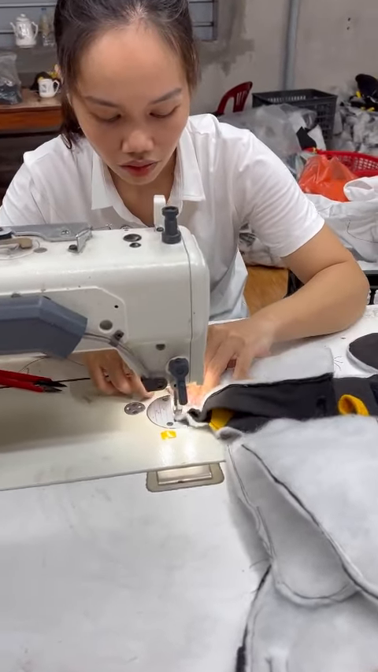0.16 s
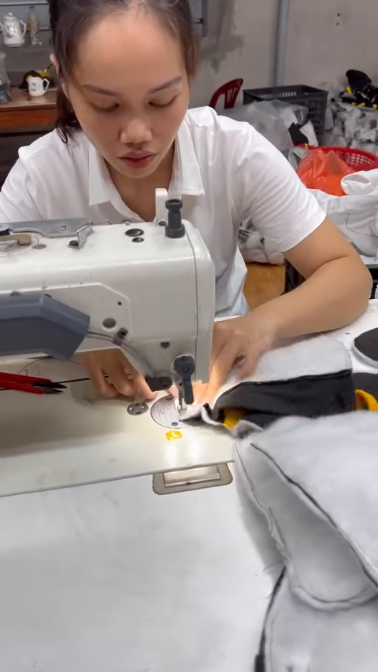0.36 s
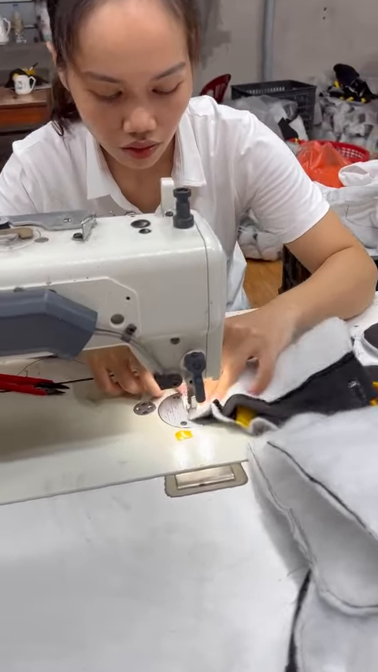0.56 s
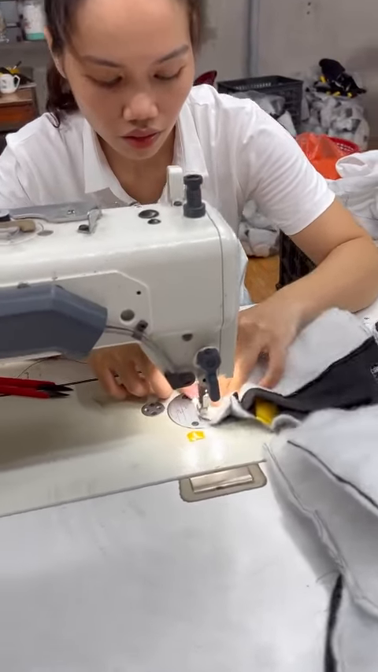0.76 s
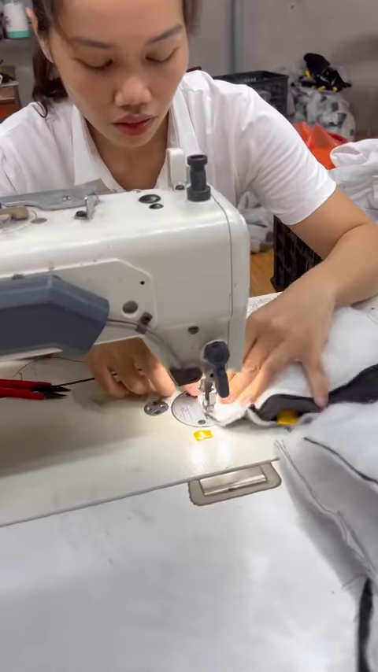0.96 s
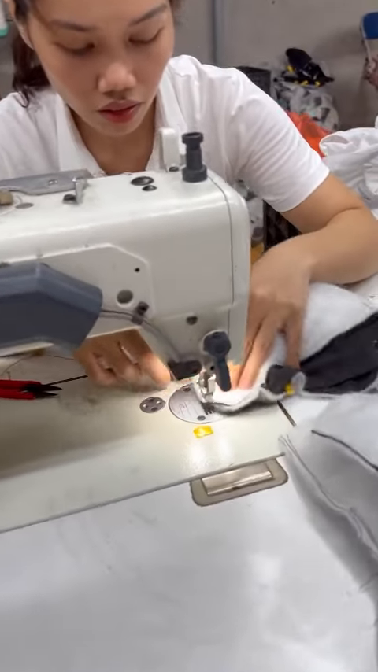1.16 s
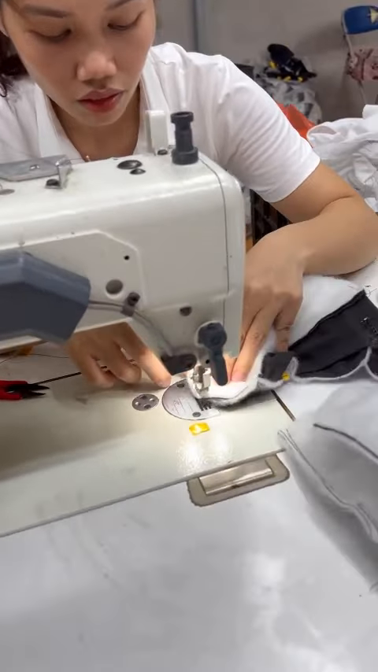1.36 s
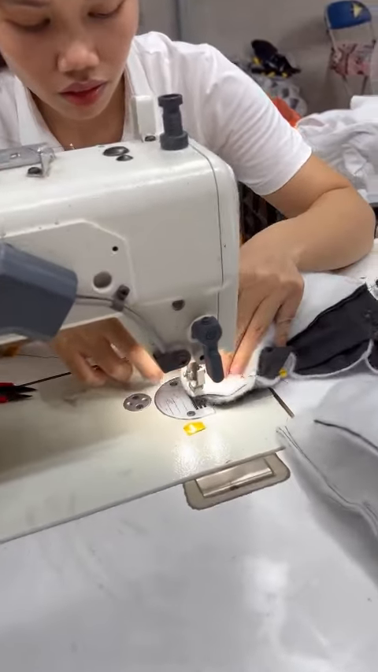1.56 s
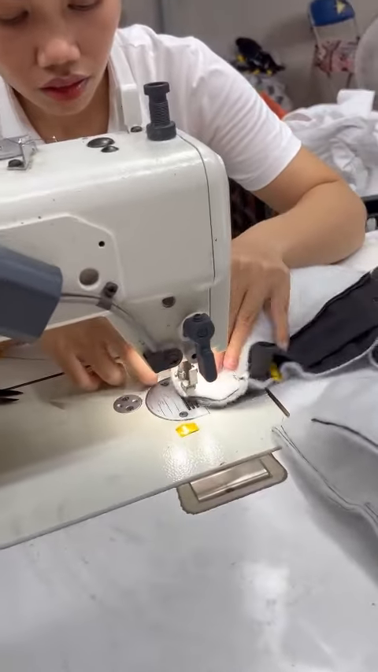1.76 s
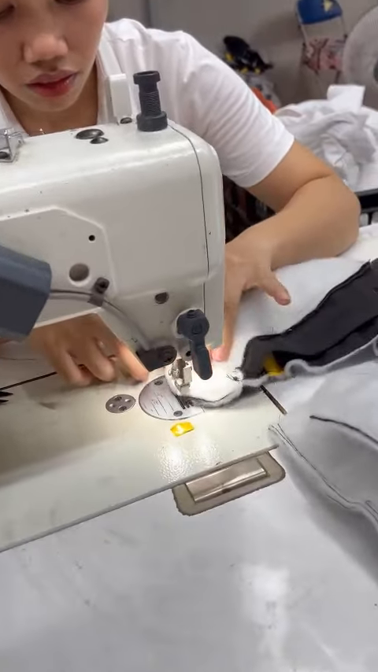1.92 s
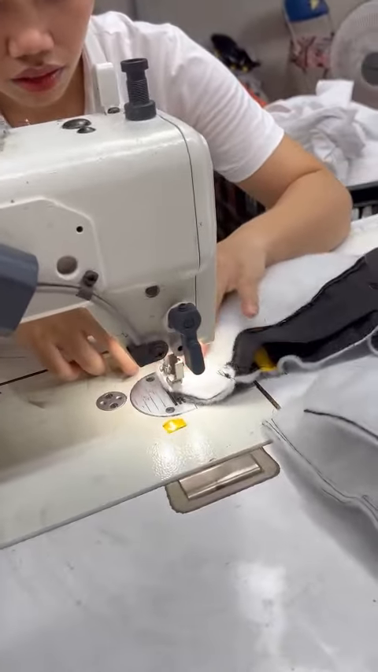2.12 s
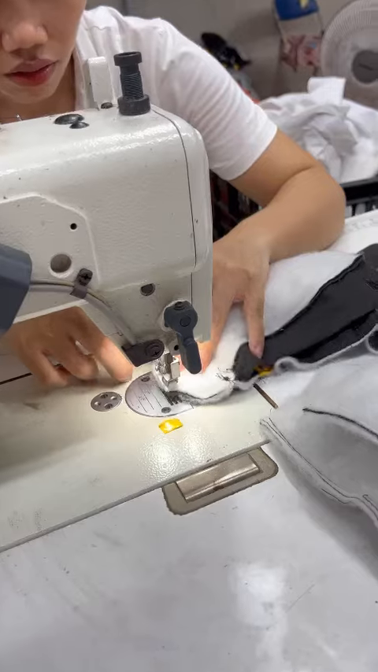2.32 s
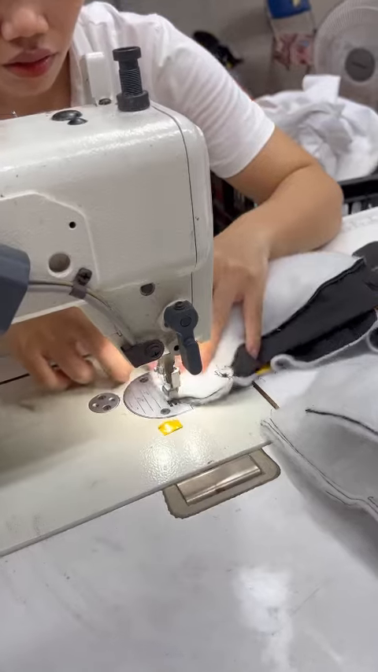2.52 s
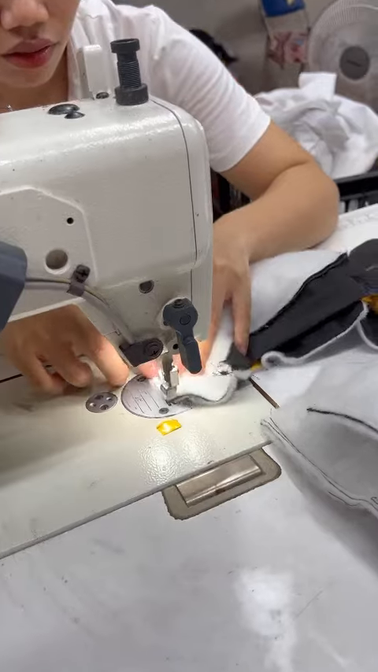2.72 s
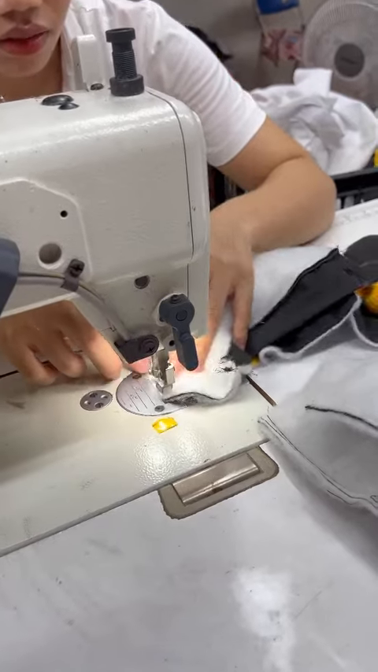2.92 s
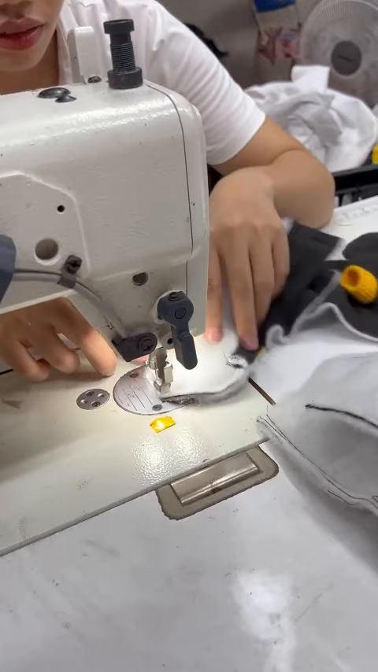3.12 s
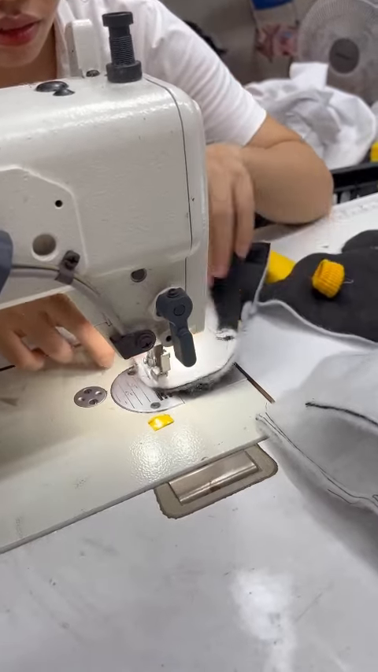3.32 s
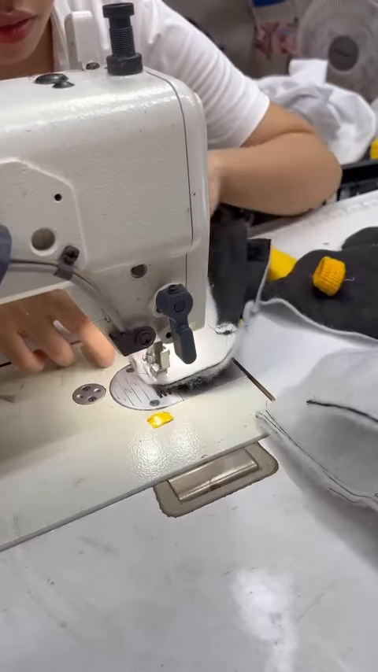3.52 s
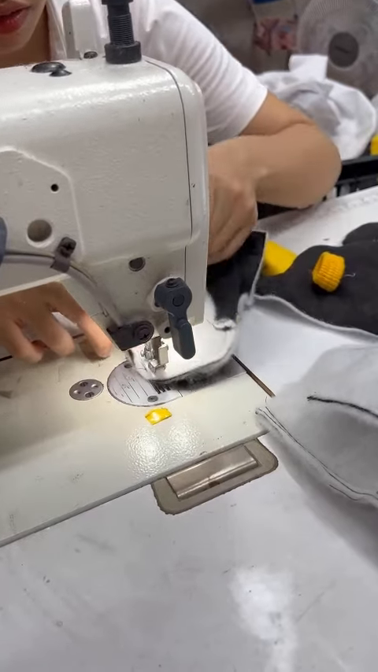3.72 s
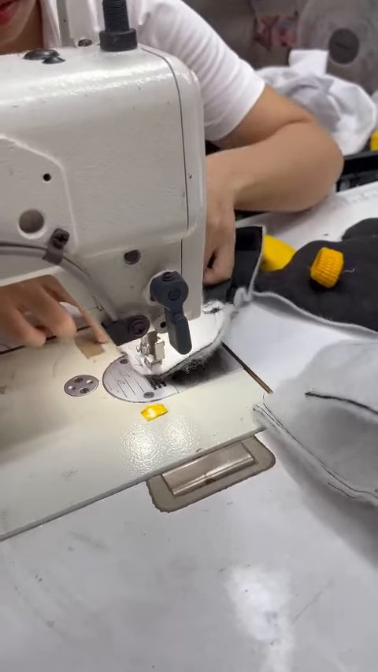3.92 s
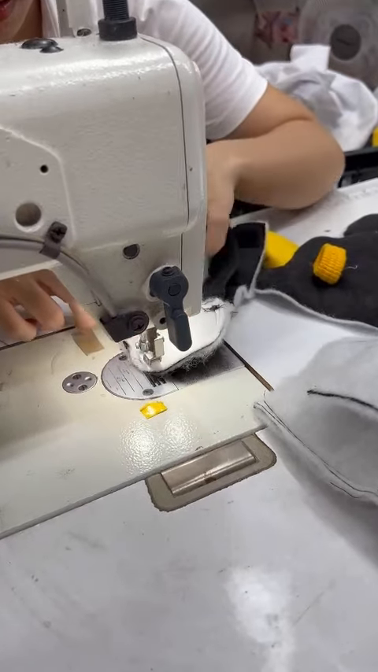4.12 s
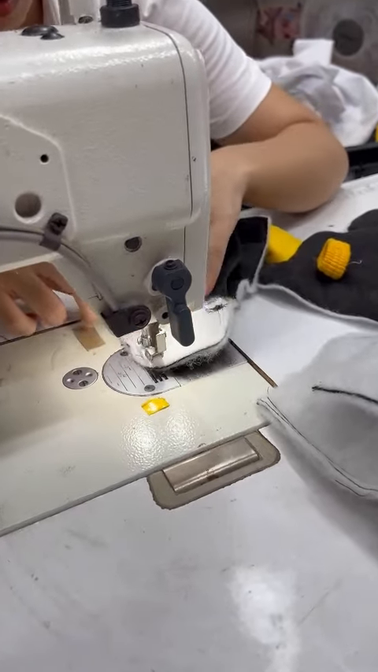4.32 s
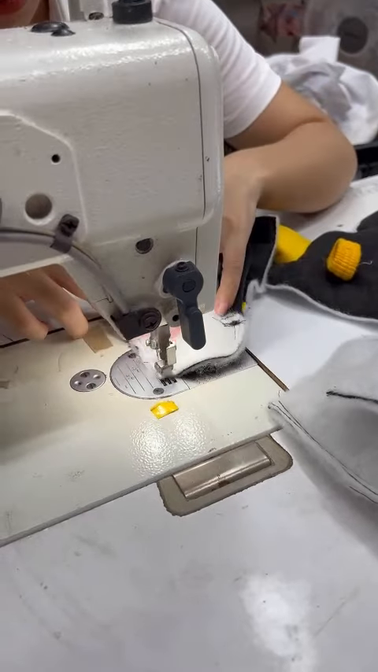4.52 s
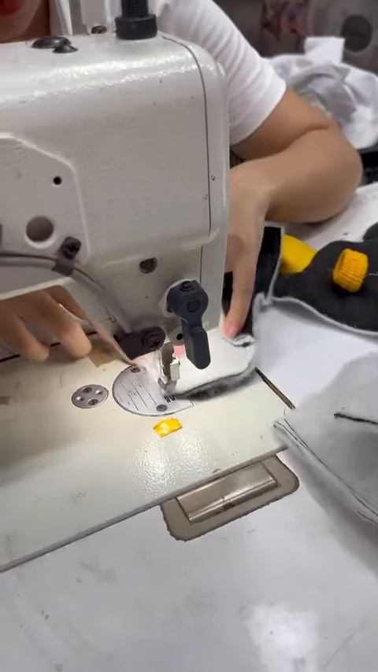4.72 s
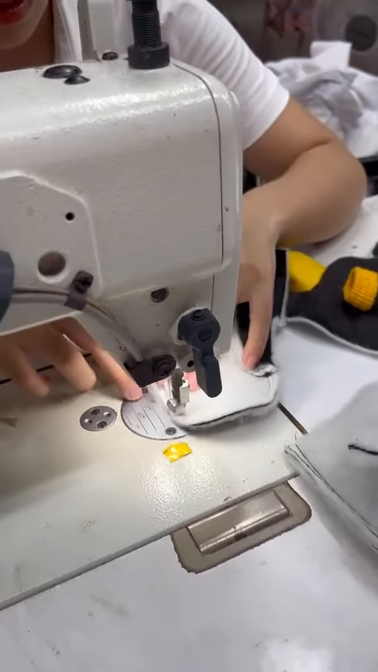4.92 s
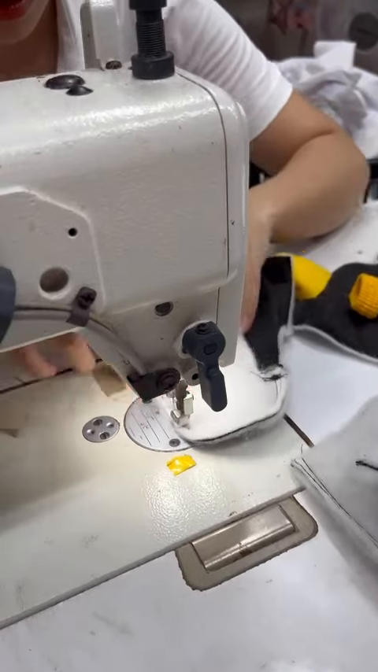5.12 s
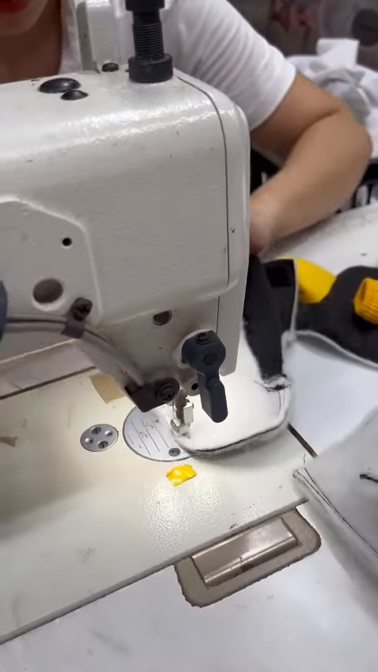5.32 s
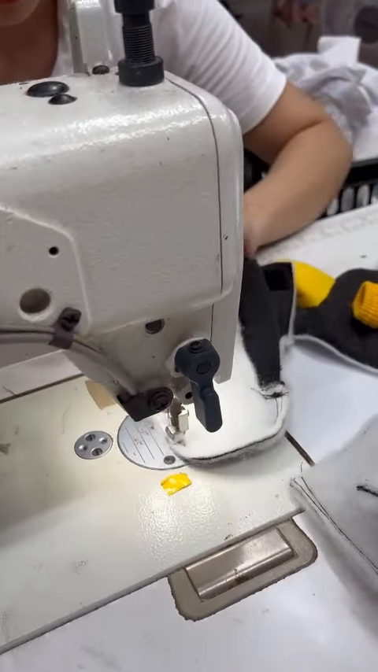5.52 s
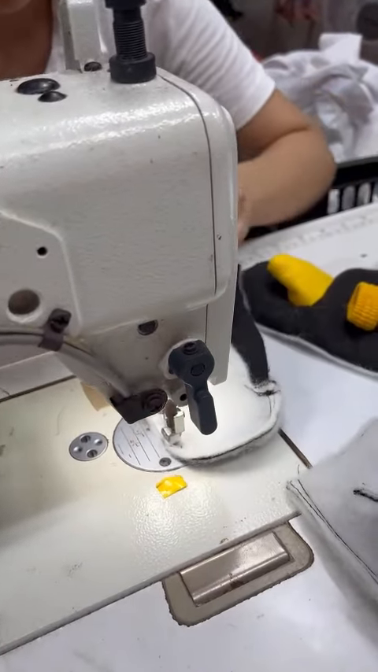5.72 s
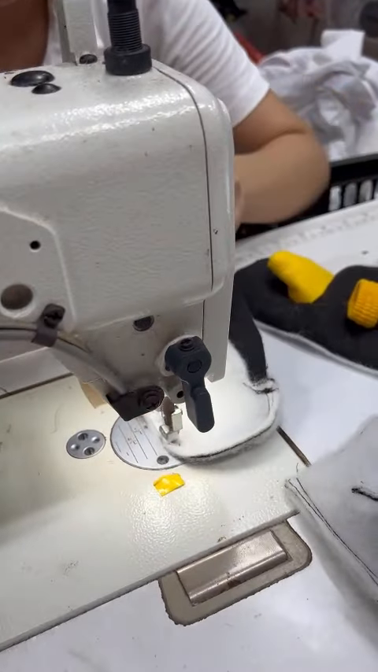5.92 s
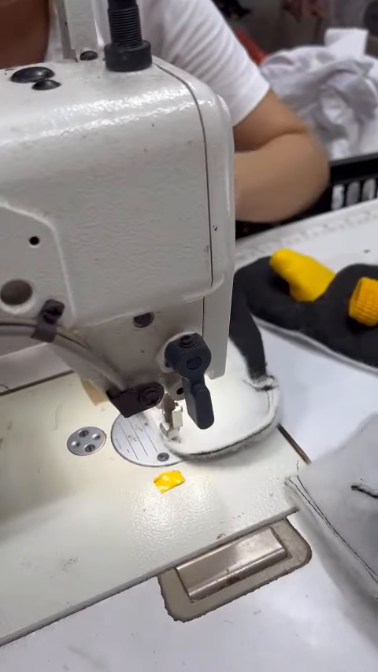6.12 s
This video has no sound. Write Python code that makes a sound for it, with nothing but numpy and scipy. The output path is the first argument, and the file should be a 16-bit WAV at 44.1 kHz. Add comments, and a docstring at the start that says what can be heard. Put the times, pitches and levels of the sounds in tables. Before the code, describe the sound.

An industrial sewing machine is heard close up in a small, slightly echoing workshop. At about 0.1 seconds a small double click starts a burst of stitching lasting a third of a second: rapid metallic clatter over a low drone from the shaking table. A shorter burst runs from 0.6 to 0.8 seconds. Every run ends with a soft jolt and the click of the pedal springing back. After a dull pedal knock, the presser foot snaps up with a loud, sharp clack at 1.1 seconds. It rattles down with a low thump at 2.4, and a third burst runs from 2.6 to 2.9. Another knock and clack come around 3.2 seconds. The foot drops again at 4.5, the last burst runs from 4.6 to 5.0, and the pedal clicks at 5.1. Quiet fan air, low motor hum and a faint high whine continue throughout, until about 6 seconds.

```python
"""A small double click, and an industrial lockstitch machine bursts into the first of four short runs,
close by in a small workshop. At about 70 stitches a second the shaft shakes the table while needle bar,
hook and feed clatter once a turn; each run ends in a jolt and the click of the pedal springing back.
Twice the pedal is heeled back: the presser foot clacks up, waits, then rattles down again.
Behind it all lie fan-stirred air, a low motor hum and a thin whine from the drive."""
import sys
import numpy as np
from scipy import signal
from scipy.fft import rfft, irfft, next_fast_len
from scipy.io import wavfile

SR = 44100
rng = np.random.default_rng(int(sys.argv[2]) if len(sys.argv) > 2 else 0)


def to_wav(sig):
    """Store sig (one row per channel, or 1-D mono) as 16-bit WAV at the path in sys.argv[1].

    Samples outside -1..1 are clipped; the rate is SR.
    """
    pcm = np.clip(np.atleast_2d(sig), -1, 1) * 32767
    pcm = np.round(pcm).astype(np.int16)
    wavfile.write(sys.argv[1], SR, pcm.T)  # frames by channels


N = 272097
T = np.arange(N) / SR
FFT_SIZE = next_fast_len(N + SR, real=True)
HZ = np.maximum(np.arange(FFT_SIZE // 2 + 1) * SR / FFT_SIZE, 1)
STITCH_HZ, RUN_UP_S = 70.1, .086
TABLE_LAG_S = .00595   # the heavy table follows the shaft a little late


# The runs of stitching. Each row: start, time at full speed and braking time in seconds, shake in dB,
# rocking at four a turn in dB against the shake, boost of the harmonics above the fourth in dB,
# thrum in dB, clatter in dB.
RUNS = [(0.070, 0.14, 0.092, -12.5, -11.5, -4.5, -23.5, -21.5),
        (0.566, 0.06, 0.093, -11.5, -14.5, -1, -21.5, -20.5),
        (2.564, .140, 0.07, -10.5, -16, 0.5, -21, -19), (4.629, 0.2, .064, -10, -21, -3, -21.5, -18)]
def shaft(start, hold, braking):
    """The servo ramps up, holds and brakes; gives the moving samples, share of full speed and turns."""
    speed = np.interp(T, start + np.cumsum([0, RUN_UP_S, hold, braking]), [0, 1, 1, 0])
    moving = speed > 0
    return moving, speed[moving], np.cumsum(speed[moving]) * STITCH_HZ / SR


def contacts(turns, places, weights, slop_s=.00008, uneven_db=3):
    """Every turn repeats the same round of metal contacts, a little uneven in time and force."""
    due = np.arange(int(turns[-1]) + 1)[:, None] + places
    when = np.interp(due, turns, np.arange(len(turns))) + slop_s * SR * rng.standard_normal(due.shape)
    force = from_db(uneven_db * rng.standard_normal(due.shape)) * (due < turns[-1])
    samples = np.clip(when, 0, len(turns) - 1).astype(int).ravel()
    return np.array([rms_one(np.bincount(samples, (force * w).ravel(), len(turns))) for w in weights])


# The tone of the clatter. Each row: frequency in Hz, relative level in dB.
CLATTER_TONE = [(100, -13), (300, -15.5), (560, 4.5), (800, -11), (950, -1.5), (1400, -5), (1700, 1.5),
                (2400, -0.5), (2800, -5), (5300, -10.5), (6400, -12.5), (7200, -12), (10000, -13),
                (16000, -20.5)]
# The cast head and needle plate ring here. Each row: frequency in Hz, width in Hz, boost in dB.
HEAD_RINGS = [(379, 29, 9), (1656, 20, 7), (1790, 120, 6), (2022, 71, 7), (2140, 25, 3.5), (2302, 34, 5),
              (2513, 55, 8.5), (3070, 110, 4), (3530, 120, 5), (4630, 340, 6.5), (6020, 550, 8),
              (6300, 100, 4.5), (8040, 330, 3), (9300, 190, -3.5)]
def needle_clatter(count=50, rub_db=-5, throb=.7, easing_db=-20, echo_ring_share=.5):
    """Needle bar, hook and feed strike the head; gives the close sound and an echo that rings less."""
    places, weights = rng.random(count), rng.choice([-1, 1], (2, count))
    clatter = np.zeros((2, N))
    for start, hold, braking, *_, clatter_db in RUNS:
        moving, speed, turns = shaft(start, hold, braking)
        # thread and cloth rub between the contacts, hardest once a turn
        rub = from_db(rub_db) * noise(len(turns)) * (1 + throb * np.cos(2 * np.pi * turns))
        # once the drive lets go, the contacts ease off faster than the shaft slows
        braked = np.maximum(T[moving] - start - RUN_UP_S - hold, 0) / braking
        force = from_db(clatter_db + easing_db * braked) * speed ** 1.22
        clatter[:, moving] += force * (contacts(turns, places, weights) + rub) / np.sqrt(2)
    softened = [(hz, width, echo_ring_share * db) for hz, width, db in HEAD_RINGS]
    echo = workshop(body(clatter, CLATTER_TONE, softened), wet_db=-16)
    return body(clatter, CLATTER_TONE, HEAD_RINGS), echo


# The low drone of head and table. Each row: multiple of the shaft rate, relative level in dB.
SHAKE_HARMONICS = [(1, 0.5), (2, -7), (3, -24.5), (5, -19.5), (6, -26), (7, -51), (8, -25), (9, -23.5)]
def table_shake():
    """Out-of-balance forces shake head and table, growing steeply with shaft speed."""
    shake = np.zeros(N)
    for start, hold, braking, shake_db, rocking_db, upper_db, *_ in RUNS:
        moving, speed, turns = shaft(start, hold, braking)
        harmonics = sum(from_db(db + upper_db * (k > 4)) * np.sin(2 * np.pi * k * turns)
                        for k, db in SHAKE_HARMONICS + [(4, rocking_db)])
        shake[moving] += np.sqrt(2) * from_db(shake_db) * speed ** 2.8 * harmonics
    return late(shake, TABLE_LAG_S)


# The tone of the table top's thrum. Each row: frequency in Hz, relative level in dB.
THRUM_TONE = [(30, -45), (55, -30.5), (95, 9.5), (170, 2), (230, 1), (310, -7), (380, -1), (470, -8),
              (600, -5.5), (760, -13.5), (1500, -37)]
def table_thrum():
    """The turning shaft stirs a rough rumble in the table top; gives the close sound and its echo."""
    thrum = np.zeros((2, N))
    for start, hold, braking, *_, thrum_db, _ in RUNS:
        moving, speed, _ = shaft(start, hold, braking)
        thrum[:, moving] += from_db(thrum_db) * speed ** 3.3 * noise(len(speed))
    thrum = late(thrum, TABLE_LAG_S)
    return body(thrum, THRUM_TONE, HEAD_RINGS), workshop(body(thrum, THRUM_TONE), wet_db=-9.5)


def start_scrape(level_db=-30):
    """While the motor pulls up to speed, the loaded drive scrapes in the head's main resonance."""
    ramp_s = RUN_UP_S * np.array([0, .35, .65, 1])
    torque = sum(np.interp(T, start + ramp_s, [.0098, .23, 1, 0]) for start, *_ in RUNS)
    return from_db(level_db) * torque * noise_band(centre_hz=2000, width_hz=550)


# The tone of a small steel tick. Each row: frequency in Hz, relative level in dB.
TICK_TONE = [(150, -19), (500, 4.5), (1100, -9.5), (1600, -2.5), (2100, 0.5), (3200, -8.5), (4500, -6.5),
             (6000, -7.5), (7200, -11), (8200, -7.5), (10000, -17), (16000, -21.5)]
# The double clicks. Each row: start in seconds, first click in dB, gap in seconds, second click in dB.
START_CLICKS = [(0.060, -31, 0.014, -41.5), (0.549, -33.5, 0.03, -32), (2.564, -22.5, .014, -23),
                (4.613, -27.5, .017, -24)]
def start_clicks(t60=.023):
    """As each run begins, the linkage takes up its slack in two clicks inside the head."""
    clicks = sum(tick(start, first_db, t60) + tick(start + gap, second_db, t60)
                 for start, first_db, gap, second_db in START_CLICKS)
    return body(clicks, TICK_TONE, HEAD_RINGS)


# The levers ring here. Each row: frequency in Hz, width in Hz, boost in dB.
LEVER_RINGS = [(2125, 159, 3), (2580, 210, 7.5), (8170, 450, 3)]
# The stop after each run. Each row: start in seconds, click in dB, brightness in dB, jolt in dB.
SHAFT_STOPS = [(0.352, -29, -12, -37), (0.802, -26, -11.5, -35), (2.876, -30.5, -3.5, -35.5),
               (4.989, -34.5, -10, -31.5)]
def stop_clicks():
    """The shaft locks with a click and one bounce, from parts too small to make much bass."""
    clicks = sum(bouncing(start, db, t60=.024, bright_db=bright_db, gap=.045, loss_db=14, count=2)
                 for start, db, bright_db, _ in SHAFT_STOPS)
    return body(butter_filter(clicks, 1000, "high"), TICK_TONE, LEVER_RINGS)


# The head's low modes on its table. Each row: pitch in Hz, dB against the jolt, t60 in seconds.
JOLT_MODES = [(74.5, 11.5, 0.44), (135.4, -6, 0.26), (278, -1.5, 0.99), (365, 2, 0.21), (620, -5, 0.32),
              (1115, -9, .15)]
def head_jolts(lead_s=.024):
    """As the shaft locks, the head rocks and its low modes ring out."""
    return sum(boom(stop - lead_s, jolt_db + db, hz, swell=.019, t60=t60)
               for stop, *_, jolt_db in SHAFT_STOPS for hz, db, t60 in JOLT_MODES)


# The pedal's return after each run. Each row: start in seconds, level in dB, bounce gap in seconds.
PEDAL_RELEASES = [(0.404, -34.5, 0.052), (0.870, -30, 0.041), (2.964, -25.5, .024), (5.104, -26, .042)]
def pedal_releases(chatter_db=-17):
    """The pedal springs back to rest with a bright click, bounces and rattles its rod."""
    clicks = 0
    for start, db, gap in PEDAL_RELEASES:
        clicks += bouncing(start, db, t60=.017, bright_db=5.5, gap=gap, loss_db=12)
        clicks += loose_rod(start, db + chatter_db)
    return body(clicks, TICK_TONE, LEVER_RINGS)


def loose_rod(start, level_db, length_s=.14, fade_db=12, count=7):
    """The pedal's rod chatters at random, ever more faintly."""
    return sum(tick(start + length_s * share, level_db - fade_db * share, t60=.048, bright_db=-12)
               for share in rng.random(count))


# The tone of the lifter's clack. Each row: frequency in Hz, relative level in dB.
CLACK_TONE = [(120, -13.5), (300, -2.5), (550, 9), (760, -2.5), (1200, -6.5), (1600, -1), (2100, -4.5),
              (2600, 2), (3100, -8), (4800, -6.5), (6400, -7), (10000, -14), (16000, -21.5)]
# The presser foot and its bar ring here. Each row: frequency in Hz, width in Hz, boost in dB.
FOOT_RINGS = [(1640, 90, 7), (1900, 120, 8), (2570, 160, 8), (3750, 220, 9)]
# The foot snaps up. Each row: start in seconds, level in dB, t60 in seconds,
# rebound in dB against the snap, extra boost of the bar's upper rings in dB.
FOOT_LIFTS = [(1.0630, -6, 0.03, -21.5, 2.5), (3.1816, -11, 0.053, -6.5, -8)]
def foot_lifts(rebound_s=.021, buzz_db=-15):
    """The lifter snaps home, rebounds once and the bar buzzes; gives the clacks and the table's boom."""
    clacks, table = 0, 0
    lowest, *upper = FOOT_RINGS
    for start, db, t60, rebound_db, ring_db in FOOT_LIFTS:
        snap = blow(start, db, t60, attack=.0014) + blow(start + rebound_s, db + rebound_db, t60=.019)
        buzz = blow(start, db + buzz_db, t60=.12, attack=.013)
        rings = [lowest] + [(hz, width, boost_db + ring_db) for hz, width, boost_db in upper]
        clacks += body(butter_filter(snap, 900, "high") + buzz, CLACK_TONE, rings)
        table += boom(start, level_db=-27, hz=112, swell=.02, t60=.26)
    return clacks, table


# The tone of a dull knock on the table. Each row: frequency in Hz, relative level in dB.
KNOCK_TONE = [(100, -8), (380, 1.5), (520, -3), (690, -4), (900, -11), (1700, -13.5), (2500, -23),
              (6000, -39), (14000, -61)]
def pedal_heel(lead_s=.152, travel_s=.04):
    """Before each lift the heel knocks the pedal back, then onto its end stop; gives knocks and boom."""
    knocks, taps, table = 0, 0, 0
    for lift, *_ in FOOT_LIFTS:
        start = lift - lead_s
        end_stop = start + travel_s
        knocks += blow(start, level_db=-27.5, t60=.115) + blow(end_stop, level_db=-28, t60=.082)
        taps += tick(end_stop, level_db=-45, t60=.023, bright_db=-12.5)
        table += boom(start, level_db=-22, hz=81.4, swell=.05, t60=.46)
    return body(knocks, KNOCK_TONE) + body(taps, TICK_TONE, LEVER_RINGS), table


# The foot drops onto the cloth. Each row: landing time in seconds, level in dB,
# the pedal's head start in seconds, pitch of the table's boom in Hz.
FOOT_LANDINGS = [(2.445, -22, .168, 95), (4.482, -20.5, 0.089, 81.2)]
def foot_landings(unlatch_s=.0087):
    """The pedal stirs the table, the lifter lets go, the foot lands bouncing; gives rattle and boom."""
    taps, knocks, table = 0, 0, 0
    for landing, db, pedal_lead, table_hz in FOOT_LANDINGS:
        taps += tick(landing - unlatch_s, db - 6, t60=.033, bright_db=-.5)
        taps += bouncing(landing, db, t60=.033, bright_db=4.5, gap=.012, loss_db=3.5)
        knocks += blow(landing, db - 5, t60=.16)
        table += boom(landing - pedal_lead, db - 6, hz=101.1, swell=.025, t60=.6)
        table += boom(landing, db - 1, table_hz, swell=.036, t60=.25)
        table += boom(landing, db - 13.5, hz=198.6, swell=.041, t60=.56)
    return body(taps, TICK_TONE, LEVER_RINGS) + body(knocks, KNOCK_TONE), table


# The tone the lifted foot sends into the room. Each row: frequency in Hz, relative level in dB.
LIFT_ECHO_TONE = [(150, -23), (500, -8.5), (1500, -5), (4500, -11), (9000, -15.5), (16000, -28)]
def lift_echo():
    """The room takes the lifter's clack from all sides at once, as one sharp crack."""
    cracks = np.zeros((2, N))
    cracks[:, [int(start * SR) for start, *_ in FOOT_LIFTS]] = 1
    return workshop(body(cracks, LIFT_ECHO_TONE), wet_db=-10, onset=.007)


# The workshop's reverb tail. Each row: frequency in Hz, t60 in seconds.
ROOM_DECAY = [(100, 1), (400, 0.71), (1500, 0.66), (4000, 0.46), (8000, 0.88), (14000, 0.59)]
def workshop(x, wet_db, onset=.0035, dull_hz=9000):
    """The diffuse echo alone builds quickly and dies band by band; piles of cloth soak up the top."""
    age, edges = T[:SR], np.geomspace(40, 18000, num=9)
    white, tail = rng.standard_normal((2, 2, SR)), 0
    for k, (low, high) in enumerate(zip(edges, edges[1:])):
        band = butter_filter(white[k % 2], [low, high], "band")
        hz = np.sqrt(low * high)
        tail += band * from_db(-60 * age / at_hz(ROOM_DECAY, hz)) / np.hypot(1, hz / dull_hz)
    build_up = 1 - np.exp(-(age / onset) ** 2)
    response = rms_one(tail * build_up) / np.sqrt(SR)
    return from_db(wet_db) * signal.fftconvolve(x, response, axes=1)[:, :N]


def faint_ring(start=.3, end=1.04, fade_s=.04, level_db=-58.5):
    """A faint, narrow band of noise hangs on from late in the first run until after the second."""
    envelope = np.clip(np.minimum(T - start, end - T) / fade_s, 0, 1)
    return from_db(level_db) * envelope * noise_band(centre_hz=2830, width_hz=230)


# The tone of the workshop's air. Each row: frequency in Hz, relative level in dB.
AIR_TONE = [(20, -36), (32, -12.5), (53, -8.5), (75, 2), (95, -8), (120, -0.5), (256, -4.5), (300, -7),
            (443, -10.5), (520, -16.5), (858, -18.5), (1950, -28), (5320, -45), (7000, -45), (9100, -69.5),
            (15400, -77)]
# The hums and the whine. Each row: frequency in Hz, width in Hz, level in dB.
MOTOR_HUMS = [(62.15, 3.5, -50.5), (189, 5, -53.5), (268.8, 5.5, -59), (7540, 500, -68.5)]
def room_tone(air_db=-41.5):
    """Fan-stirred air, with motor hums and the drive's thin whine wavering as narrow bands of noise."""
    air = from_db(air_db) * body(noise(), AIR_TONE)
    bands = sum(from_db(db) * rms_one(1 / (1 + (2 * (HZ - hz) / width) ** 4))
                for hz, width, db in MOTOR_HUMS)
    return air + irfft(rfft(noise(FFT_SIZE)) * bands, FFT_SIZE)[:, :N]


def blow(start, level_db, t60, attack=.002):
    """One contact: a dense buzz of vibration that dies away, in two unrelated channels."""
    out, first = np.zeros((2, N)), int(start * SR)
    age = T[:min(SR // 2, N - first)]
    envelope = np.minimum(age / attack, 1) * from_db(level_db - 60 * age / t60)
    out[:, first:first + len(age)] = envelope * noise(len(age))
    return out


def tick(start, level_db, t60, bright_db=0, pivot_hz=3000):
    """A small steel part taps the head, duller or brighter about a middle pitch."""
    tap = blow(start, level_db, t60, attack=.0016)
    low = butter_filter(tap, pivot_hz, "low", order=1)
    return low * from_db(-bright_db) + (tap - low) * from_db(bright_db)


def bouncing(start, level_db, t60, bright_db, gap, loss_db, count=3):
    """A tick and its bounces, each weaker than the last."""
    return sum(tick(start + k * gap, level_db - k * loss_db, t60, bright_db) for k in range(count))


def boom(start, level_db, hz, swell, t60):
    """A push swells one of the table's low vibrations, which then dies."""
    out, first, age = np.zeros(N), int(start * SR), T[:SR]
    envelope = np.minimum(age / swell, 1) * from_db(level_db - 60 * np.maximum(age - swell, 0) / t60)
    out[first:first + SR] = envelope * np.sin(2 * np.pi * hz * age)
    return out


def body(x, tone, rings=()):
    """Play x through a body with a broad tone and resonant peaks; white noise keeps its power."""
    peaks_db = sum(db / (1 + (2 * (HZ - hz) / width) ** 2) for hz, width, db in rings)
    gain = rms_one(from_db(at_hz(tone, HZ) + peaks_db))
    # minimum phase, so the ringing follows the hit
    cepstrum = irfft(np.log(gain), FFT_SIZE)
    cepstrum[1:FFT_SIZE // 2] *= 2
    cepstrum[FFT_SIZE // 2 + 1:] = 0
    return irfft(rfft(x, FFT_SIZE) * np.exp(rfft(cepstrum)), FFT_SIZE)[..., :N]


def noise(length=N):
    """Two unrelated channels of white noise."""
    return rng.standard_normal((2, length))


def noise_band(centre_hz, width_hz):
    """A band of noise at unit power."""
    return rms_one(butter_filter(noise(), [centre_hz - width_hz / 2, centre_hz + width_hz / 2], "band"))


def butter_filter(x, hz, kind, order=2):
    """A gentle low, high or band pass; the tiny offset keeps silence quick to compute."""
    return signal.sosfilt(signal.butter(order, hz, kind, fs=SR, output="sos"), x + 1e-18)


def late(x, lag):
    """Delay by lag seconds."""
    return np.roll(x, int(lag * SR), axis=-1)


def from_db(db):
    """Decibels to gain."""
    return 10 ** (np.asarray(db) / 20)


def rms_one(x):
    """Scale to unit power."""
    return x / np.sqrt(np.mean(x ** 2) + 1e-20)


def at_hz(points, hz):
    """Read a table on a log-frequency axis."""
    frequencies, values = np.transpose(points)
    return np.interp(np.log(hz), np.log(frequencies), values)


# The stereo width of diffuse sound. Each row: frequency in Hz, side against mid in dB.
STEREO_WIDTH = [(150, -39.5), (300, -12), (450, -7), (600, -5), (1350, -2), (1600, -14), (1950, -11.5),
                (2500, -5.5), (3300, -5.5), (3900, -10.5), (4700, -7), (6000, -2), (8000, -1),
                (16000, -0.2)]
def stereo(pair, narrowing=.99):
    """Two unrelated signals become mid and side, then left and right; more narrowing leaves less side."""
    mid, side = rfft(pair, FFT_SIZE)
    side = side * from_db(narrowing * at_hz(STEREO_WIDTH, HZ))
    return irfft(np.array([mid + side, mid - side]), FFT_SIZE)[:, :N]


def scene():
    """The machine close and narrow, the room wide around it, the table's low end in the centre."""
    clatter, clatter_echo = needle_clatter()
    thrum, thrum_echo = table_thrum()
    clacks, lift_boom = foot_lifts()
    heel, heel_boom = pedal_heel()
    landing, landing_boom = foot_landings()
    small_parts = start_clicks() + stop_clicks() + pedal_releases() + heel + landing
    near = clatter + thrum + start_scrape() + clacks + small_parts
    echo = clatter_echo + thrum_echo + workshop(small_parts, wet_db=-20) + lift_echo()
    lingering = body(blow(0, level_db=-54.5, t60=.6), TICK_TONE)   # the room still rings at the opening
    diffuse = echo + lingering + faint_ring() + room_tone()
    table = table_shake() + head_jolts() + lift_boom + heel_boom + landing_boom
    return stereo(near, narrowing=1.94) + stereo(diffuse) + table


def record(dry, cutoff_hz=16000):
    """A soft clip rounds off the highest peaks and a steep filter cuts the top."""
    rounded = dry / (1 + dry ** 8) ** (1 / 8)
    return signal.sosfilt(signal.ellip(10, .2, 80, cutoff_hz, fs=SR, output="sos"), rounded)


dry = scene()
out = record(dry)
to_wav(out)
```